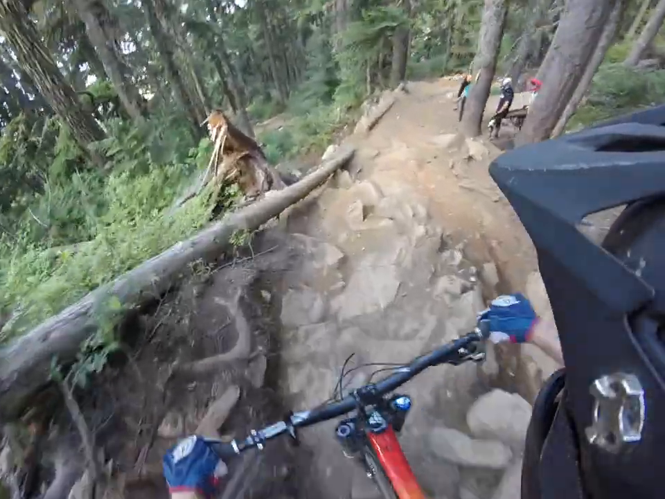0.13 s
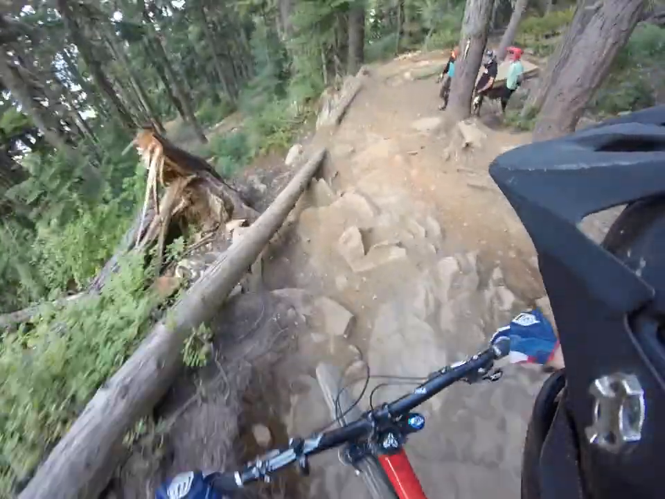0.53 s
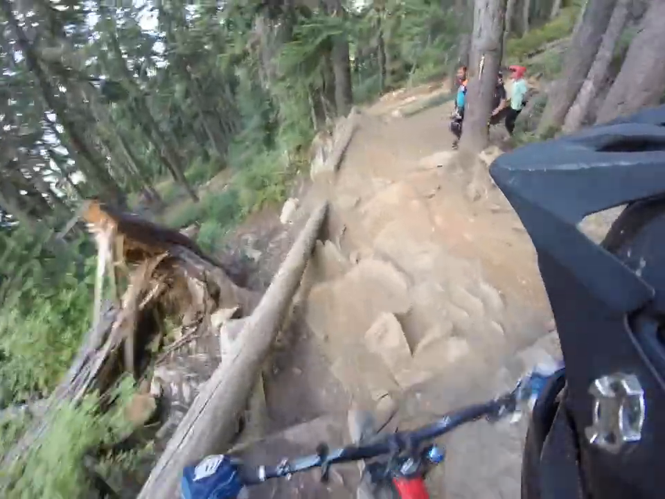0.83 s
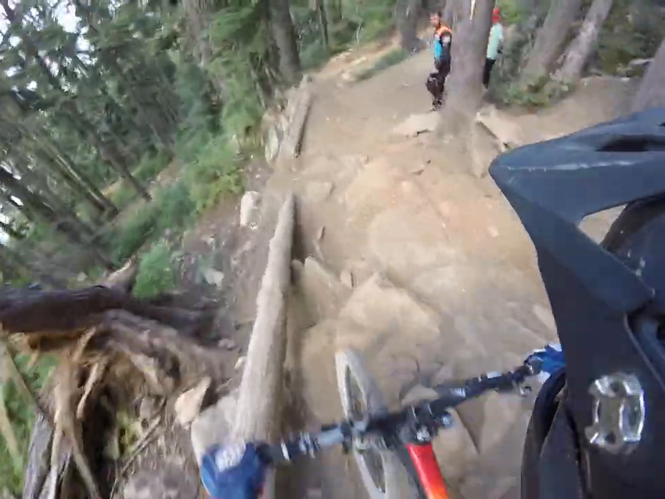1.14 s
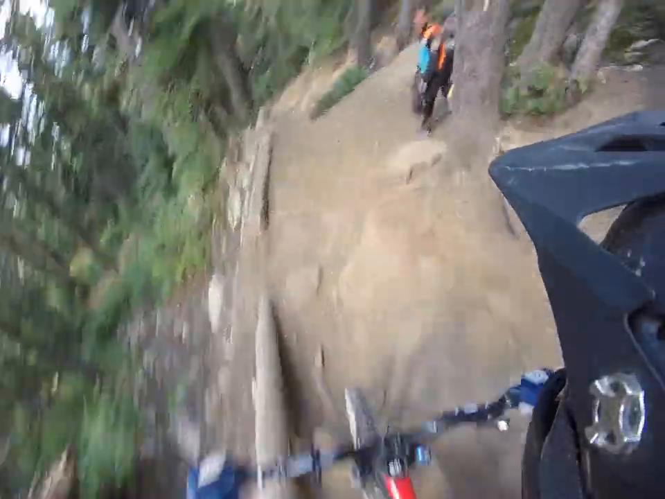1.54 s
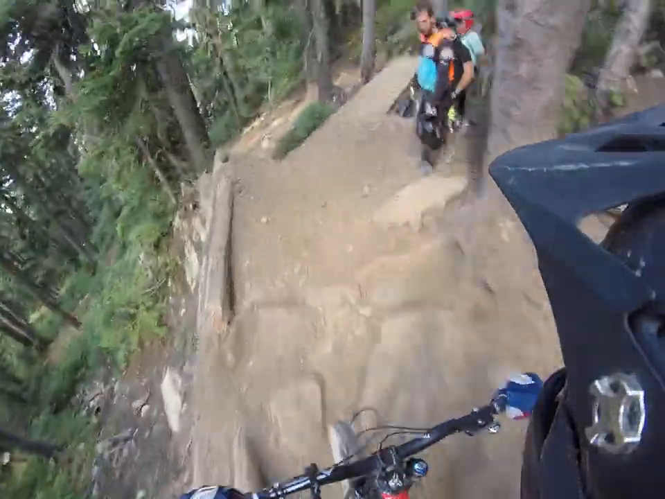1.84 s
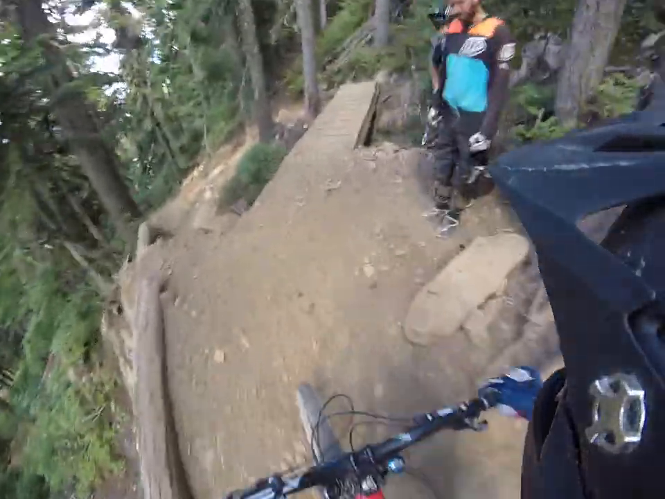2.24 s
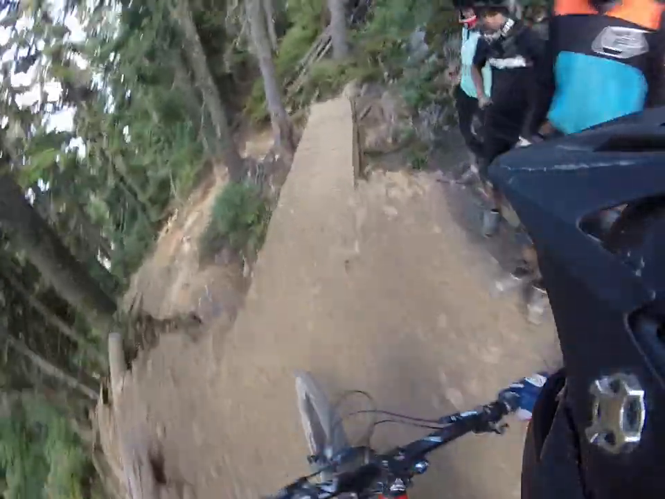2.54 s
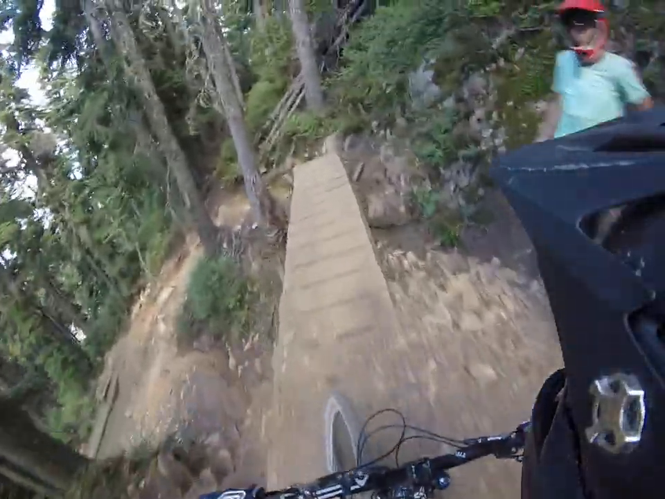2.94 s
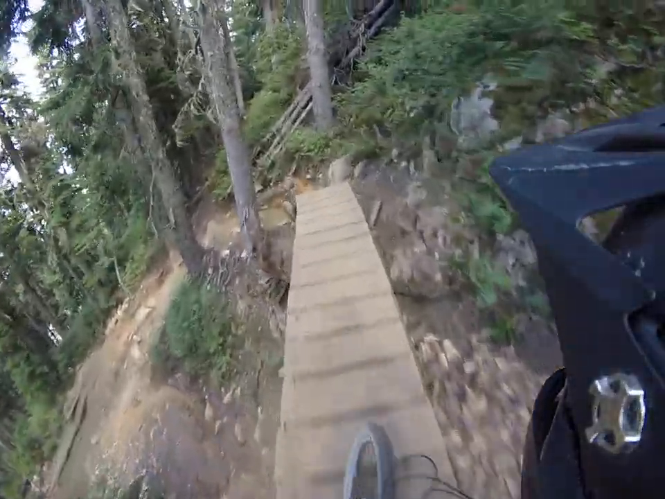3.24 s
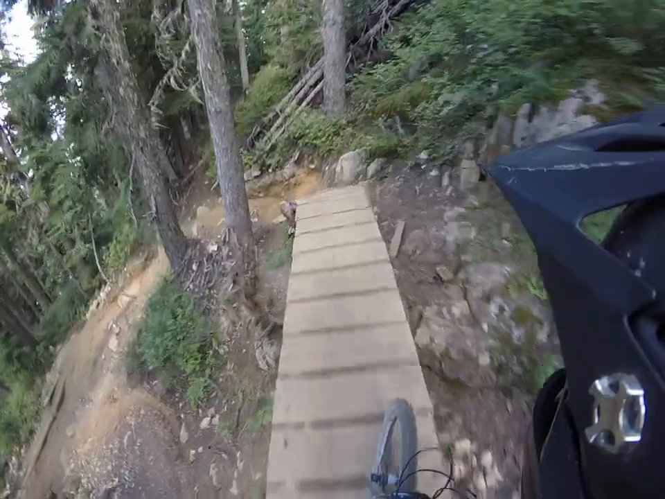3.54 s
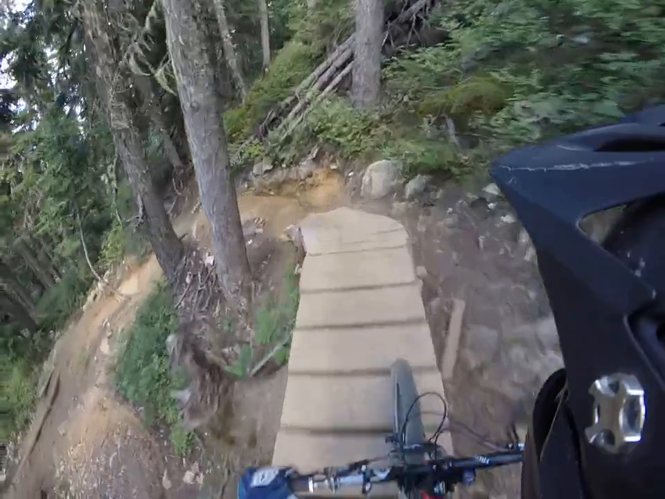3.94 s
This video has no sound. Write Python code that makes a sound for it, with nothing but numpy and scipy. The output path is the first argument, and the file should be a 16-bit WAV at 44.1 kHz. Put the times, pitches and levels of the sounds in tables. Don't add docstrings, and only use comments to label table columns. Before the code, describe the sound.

Close helmet-camera sound inside a closed housing: a mountain bike bumps over rocks outdoors. Chain slaps, cable ticks, spoke pings and dull tyre knocks come in irregular bursts, densest around two seconds, then thin out on smoother ground. Low wind gusts boom beneath, and faint brake squeaks sit extremely high. Trees add only short, faint echoes.

```python
import sys
import numpy as np
from scipy import signal
from scipy.fft import rfft, irfft, next_fast_len
from scipy.io import wavfile
from scipy.ndimage import uniform_filter1d, map_coordinates

SR = 44100
rng = np.random.default_rng(int(sys.argv[2]) if len(sys.argv) > 2 else 0)


def ratio_of_db(decibels):
    return 10 ** (np.asarray(decibels, float) / 20)


def store_wav(level_fs):
    pcm = np.round(np.clip(np.atleast_2d(level_fs), -1, 1) * 32767)
    wavfile.write(sys.argv[1], SR, pcm.T.astype(np.int16))


N = 180898

# (frequency [Hz], width [Hz], level [dB])
HOUSING = [(1590, 164, -2.5), (2367, 220, 7.5), (3205, 158, 6), (4106, 450, 5), (4803, 220, 4),
           (5486, 256, 7), (6850, 556, 5.5), (8140, 780, 2)]

# (time [s], peak level [dB], pitch [Hz], t60 [s])
TICKS = [(0.5317, -38.5, 2400, 0.021), (0.71, -41, 1218, 0.094), (0.7442, -32.5, 1210, 0.056),
         (0.827, -40, 1220, 0.037), (0.8568, -37, 1536, 0.056), (1.1987, -64, 1190, 0.023),
         (1.2315, -36.5, 1155, 0.034), (1.271, -44, 2150, 0.026), (1.454, -52, 1210, 0.058),
         (1.6, -39, 2050, 0.031), (1.815, -32, 3060, 0.023), (1.88, -39, 1630, 0.031),
         (2.072, -33.5, 2350, 0.041), (2.113, -30.5, 1604, 0.057), (2.139, -32.5, 2350, 0.049),
         (2.2075, -31.5, 2370, 0.0091), (2.2176, -32, 2930, 0.023), (2.2404, -34, 2570, 0.027),
         (2.4025, -43, 1300, 0.027), (2.441, -44, 1360, 0.024), (2.4989, -35.5, 2160, 0.023),
         (2.538, -37, 2540, 0.026), (2.55, -36.5, 2220, 0.033), (3.0834, -38, 2570, 0.053),
         (3.1494, -42.5, 2110, 0.068), (3.229, -46, 1300, 0.014), (3.2446, -32.5, 2280, 0.017),
         (3.2702, -35, 1930, 0.011), (3.391, -47, 2200, 0.02), (3.7013, -45.5, 2330, 0.019)]
# (time [s], peak level [dB], pitch [Hz], t60 [s])
SLAPS = [(.0504, -16.5, 2454, 0.022), (0.237, -25, 1590, 0.053), (.502, -32, 2340, 0.06),
         (.6848, -27, 2450, 0.04), (.7241, -27, 2140, 0.015), (1.1108, -26.5, 2410, 0.052),
         (1.124, -38, 2410, 0.037), (1.1794, -34, 2274, 0.071), (1.4814, -25, 2474, 0.041),
         (1.4994, -30, 2120, 0.026), (1.6874, -41, 2160, 0.011), (1.7579, -20.5, 2496, 0.035),
         (2.091, -24, 2340, 0.018), (2.189, -33, 1590, 0.023), (2.3244, -18.5, 3170, 0.015),
         (2.3494, -31, 2150, 0.041), (2.36, -32, 2430, 0.022), (2.5237, -33, 2360, 0.015),
         (2.645, -23, 2533, 0.026), (2.6537, -20.5, 2380, 0.013), (3.0551, -31, 2387, 0.029),
         (3.2548, -19.5, 2480, 0.022), (3.9362, -31.5, 2560, 0.042)]
# (time [s], peak level [dB], pitch [Hz], t60 [s])
CLACKS = [(.0005, -31.5, 1800, 0.032), (0.024, -41, 1875, 0.094), (1.351, -39, 1790, 0.026),
          (1.556, -22, 2030, 0.023), (1.581, -26, 1490, 0.025), (1.6107, -29, 2100, 0.017),
          (1.6403, -16.5, 2430, 0.0094), (1.9643, -22.5, 1450, 0.017), (2.126, -28, 2310, 0.038),
          (2.083, -32, 2320, 0.049), (2.159, -27, 2360, 0.023), (1.224, -36.5, 2440, 0.02),
          (1.623, -36.5, 1300, 0.07)]
# (time [s], peak level [dB], pitch [Hz], t60 [s])
THUMPS = [(0.176, -42, 2440, 0.016), (.3386, -42.5, 1433, 0.18), (.4606, -37.5, 2250, 0.05),
          (.4785, -34, 770, 0.074), (.479, -36, 1770, 0.019), (.5745, -30, 1935, .025),
          (.695, -43, 1760, .025), (1.104, -36, 980, 0.037), (1.155, -47, 896, 0.037),
          (1.317, -30, 1000, 0.027), (1.333, -34.5, 934, 0.032), (2.094, -28, 1560, 0.022),
          (2.058, -39, 1020, .03), (2.358, -36, 1770, 0.027), (0.563, -29, 2260, 0.03),
          (0.5745, -39.5, 940, 0.013), (0.667, -33, 1570, 0.023), (.69, -33, 770, 0.031),
          (.9028, -31.5, 2170, 0.026), (1.0769, -43, 2420, 0.069), (1.1545, -28, 2166, 0.059),
          (1.307, -31.5, 1815, 0.062), (1.33, -29.5, 1910, 0.033), (1.3705, -31, 1910, 0.013),
          (1.7954, -34, 1306, 0.02), (1.936, -34, 1770, 0.024), (2.4608, -47, 2210, 0.036),
          (2.622, -37, 2520, 0.066), (2.7334, -40, 2230, 0.029), (2.759, -36.5, 2260, 0.061),
          (3.33, -40.5, 2270, 0.039), (3.525, -41.5, 1530, 0.094), (3.889, -44.5, 1770, 0.024),
          (3.556, -31.5, 1830, 0.016), (.206, -44, 2170, .04), (.77, -43, 1490, 0.026),
          (.94, -44, 2210, 0.031), (1.409, -50, 2000, 0.024), (1.715, -40, 2060, 0.045),
          (2.346, -39, 1120, 0.039), (2.45, -41, 2480, 0.03), (2.487, -39.5, 790, 0.028),
          (2.953, -40.5, 1600, 0.019),
          (.4792, -31, 1500, .02), (.5745, -28, 930, .022), (.691, -32, 1900, .025),
            (2.3255, -22, 2480, .025), (2.334, -31, 2000, .04)]
# (time [s], peak level [dB], pitch [Hz], t60 [s])
SCUFFS = [(0.2894, -39.5, 1410, 0.028), (0.676, -40, 2300, 0.021), (0.99, -37, 2480, 0.017),
          (1.0622, -42, 2460, 0.029), (1.527, -43, 1280, 0.027), (1.659, -35, 2300, 0.034),
          (1.837, -33.5, 1590, 0.029), (1.864, -43, 1310, 0.056), (2.027, -29.5, 2230, 0.014),
          (2.035, -38, 2340, 0.093), (2.1687, -30, 2220, 0.044), (2.2667, -39.5, 2400, 0.023),
          (2.307, -40.5, 1780, 0.026), (2.605, -40.5, 1220, 0.05), (2.689, -43, 1300, 0.065),
          (2.84, -44.5, 2500, 0.058), (2.9295, -42, 2990, 0.024), (3.018, -49, 1996, 0.12),
          (3.46, -46, 1640, 0.048), (3.507, -49.5, 1220, 0.1), (3.787, -38.5, 2220, 0.021)]
# (time [s], peak level [dB], pitch [Hz], t60 [s])
PINGS = [(0.0369, -30, 4670, 0.044), (0.0758, -35, 4620, 0.032), (0.1136, -39.5, 5620, 0.045),
         (0.177, -37, 6460, 0.03), (0.2481, -30.5, 4660, 0.024), (0.3682, -37.5, 5600, 0.035),
         (0.4499, -42, 6690, 0.044), (0.476, -44, 5430, 0.022), (0.5544, -43, 5240, 0.025),
         (0.6784, -39, 5250, 0.022), (0.7734, -42, 5580, 0.029), (0.8644, -41, 6300, 0.017),
         (0.89, -40, 5050, 0.044), (0.9094, -48, 5500, 0.035), (0.967, -37, 5570, 0.035),
         (1.0056, -35.5, 5440, 0.035), (1.056, -43, 6490, 0.032), (1.0784, -34.5, 5420, 0.027),
         (1.0905, -44, 4450, 0.018), (1.1274, -53, 4830, 0.022), (1.1644, -45, 4810, 0.05),
         (1.173, -33, 5720, 0.037), (1.1894, -52, 5540, 0.027), (1.214, -37, 4620, 0.023),
         (1.2485, -54, 4500, 0.035), (1.3643, -44.5, 4690, 0.045), (1.4075, -47, 4590, 0.035),
         (1.5675, -37.5, 4800, 0.017), (1.6856, -40, 4760, 0.035), (1.7095, -43, 5800, 0.024),
         (1.7443, -48, 6660, 0.03), (1.7953, -41, 4620, 0.042), (1.842, -36, 5580, 0.038),
         (1.8624, -45, 5900, 0.029), (1.8731, -41, 4730, 0.044), (1.899, -40, 5500, 0.024),
         (2.01, -42, 4840, 0.049), (2.027, -43, 5700, 0.042), (2.191, -34, 5530, .02),
         (2.3414, -37, 6460, 0.027), (2.3814, -44, 5050, 0.031), (2.459, -41, 4380, 0.032),
         (2.489, -42, 4630, 0.027), (2.7784, -43.5, 5820, 0.031), (3.017, -42, 5180, 0.035),
         (3.119, -42, 6750, 0.032), (3.5233, -46, 5510, 0.035)]
# (time [s], peak level [dB])
SPARKS = [(0.0503, -55), (0.2458, -61), (0.5033, -53), (0.7487, -53), (0.8629, -44), (1.1139, -46),
          (1.2356, -62), (1.6392, -60), (1.7599, -56), (1.8437, -57), (1.8786, -50), (1.9654, -51),
          (2.0348, -53), (2.0717, -54), (2.096, -38), (2.1428, -33), (2.2179, -58), (2.3241, -45),
          (2.5521, -58), (2.6449, -63), (3.245, -39), (3.2554, -55), (3.271, -46), (3.7878, -60)]
# (dull [dB], middle [dB], bright [dB], top [dB], own note [dB])
CONTACT_MIX = [
    (-42, -1.5, -4, -29, -15.5),
    (-30, -7, -16.5, -36, -15),
    (-18.5, -7.5, -22, -45, -10),
    (-13, -10, -33, -50, -9.5),
    (-18, -4.5, -9.5, -35, -13.5),
    (-22, -6.5, -13, -34, -9),
    (-60, -25, -12, 16, -29),
]
RISES = [.05, .04, .035, .03, .03]

# (time [s], level [dB])
SPEED = [(0, 5), (.45, -5.5), (.7, 4.5), (1.2, 0.5), (1.55, -0.5), (2, -5), (2.55, -2.5), (3.2, -8.5),
         (3.6, -11), (4.1, -6.5)]
# (time [s], rattle level [dB], half width [s], crunch over rattle [dB])
SHAKES = [(.07, -59, 0.08, -21), (.48, -58, 0.061, -15), (0.979, -60, 0.41, -21), (1.72, -59.5, 0.039, -9),
          (1.871, -57.5, 0.096, 3.5), (2.0, -54.5, 0.058, -8), (2.13, -50, 0.067, -2),
          (2.33, -51, 0.055, -34), (2.52, -55, 0.028, -3)]

# (time [s], peak level [dB], pitch [Hz], t60 [s])
SQUEAKS = [(0.0483, -61, 13200, 0.2), (0.2988, -56.5, 12950, 0.35), (0.377, -57.5, 13300, 0.23),
           (0.437, -54.5, 13040, 0.18), (0.5242, -62, 13200, 0.2), (0.5786, -64, 13100, 0.18),
           (1.57, -74, 13100, 0.4), (1.6965, -64, 13000, 0.29), (1.758, -57.5, 13000, 0.55),
           (1.8357, -62, 12950, 0.22), (1.912, -64, 12900, 0.25), (2.135, -65, 12950, 0.3),
           (2.252, -58, 13000, 0.38), (2.3216, -58, 12600, 0.22), (2.397, -55, 12960, 0.2),
           (2.4643, -64, 12700, 0.28), (2.765, -54.5, 12950, 0.45), (2.862, -43.5, 12870, 0.15),
           (3.095, -70, 12750, 0.27), (3.172, -46, 13140, 0.17), (3.5554, -54, 12600, 0.32),
           (3.79, -48, 12870, 0.24), (3.925, -62, 12500, 0.14), (4.079, -53, 12600, 0.14)]
# (time [s], peak level [dB], pitch [Hz], t60 [s])
THIN_SQUEAKS = [(1.008, -54, 14900, 0.088), (1.316, -49, 14950, 0.077)]

# (time [s], boom level [dB], half width [s], flutter over boom [dB], ring [Hz])
GUSTS = [(.036, -32.5, 0.059, -15.5, 35.7), (0.088, -33, 0.02, -23, 35.6),
         (0.153, -17.5, 0.01, -15.5, 34.7), (0.237, -27.5, 0.042, -16, 36), (.292, -9.5, 0.0096, -16.5, 38),
         (0.337, -14.5, 0.0066, -24, 29), (0.408, -29, 0.066, -27, 38), (0.505, -19, 0.0074, -23, 35.6),
         (0.565, -22.5, 0.017, -37, 39), (0.61, -18.5, 0.034, -31, 41.4), (0.718, -21, 0.023, -26, 38),
         (0.753, -14.5, 0.032, -16.5, 46.8), (0.814, -6.5, 0.033, -25, 47), (.887, -21, 0.019, -16, 38.3),
         (0.966, -17.5, 0.05, -21, 39.2), (1.069, -27, 0.12, -24, 33.4), (1.15, -22, 0.039, -27, 45.4),
         (1.222, -9, 0.056, -25.5, 45.6), (1.308, -20.5, 0.031, -23.5, 41.2),
         (1.419, -23, 0.053, -22.5, 40.6), (1.548, -19.5, 0.026, -23, 36),
         (1.644, -24.5, 0.022, -12.5, 39.4), (1.699, -25, 0.056, -14.5, 47.5),
         (1.796, -20, 0.018, -18, 28.6), (1.862, -13, 0.033, -25, 43.4), (1.911, -14, 0.03, -43, 44),
         (1.944, -19, 0.011, -16, 30), (1.988, -11, 0.0277, -22.5, 44.4), (2.04, -24.5, 0.052, -16, 47),
         (2.112, -17, 0.028, -24.5, 30), (2.174, -14, 0.022, -29, 44.7), (2.208, -18, 0.017, -13.5, 46.5),
         (2.265, -19, 0.03, -18, 34.2), (2.431, -29, 0.095, -22, 42), (2.591, -24.5, 0.043, -19, 40.8),
         (2.731, -28.5, 0.074, -22, 39.3), (3.128, -32, 0.051, -31, 38.4), (3.467, -33, 0.028, -13, 40),
         (3.6, -38.5, 0.07, -23, 41.8), (3.761, -38.5, 0.088, -33, 44.4)]
# (frequency [Hz], level [dB per Hz])
BOOM = [(6, -21), (14, -7.5), (25, -2.5), (34, -11), (46, -4.5), (56, -8.5), (62, -26), (70, -120)]
# (frequency [Hz], level [dB])
FLUTTER = [(62, -120), (70, 8), (95, -0.5), (118, 0.5), (128, 1), (140, -120)]
# (frequency [Hz], level [dB])
THUD = [(125, -120), (140, 2), (200, -1), (300, -9.5), (450, -120)]
# (frequency [Hz], level [dB])
RUSH = [(200, -120), (290, -10), (945, -17.5), (1400, -20.5), (2290, -25), (2790, -24), (5550, -29.5),
        (7000, -33.5), (12500, -41.5), (13500, -39), (15400, -56.5)]
# (time [s], peak level [dB], half width [s])
HUMS = [(.04, -80, 0.026), (.39, -41.5, 0.016), (.56, -45.5, 0.021), (.97, -46, 0.081), (1.36, -58, 0.026),
        (1.941, -51, 0.029), (2.23, -45.5, 0.044), (2.37, -49.5, 0.027), (2.8, -48.5, 0.063),
        (3.16, -55, 0.028), (3.33, -52, 0.058), (3.9, -54, 0.019), (4.06, -54, 0.018)]
# (time [s], peak level [dB], half width [s])
CASING = [(.265, -57, 0.017), (.51, -61, 0.015), (.79, -58.5, 0.022), (.9, -63, 0.017), (1.88, -57, 0.0117),
          (1.955, -61, 0.024), (2.19, -61, .015)]

CRUNCH_DB, RATTLE_DB = -61.5, -62
CALM_BOOM_DB, CALM_FLUTTER_DB = -42, -57.5
CALM_THUD_DB, CALM_RUSH_DB = -62, -64.5
THUD_FOLLOWS, RUSH_FOLLOWS = 0.35, 0.16
FLUTTER_LEAD_S = 0.016
MOUNT_DB, RAGGED_DB = -0.5, -14
HUM_HZ, CASING_HZ = 116.5, 402.8
LEAD_IN_S, LEAD_IN_DB = 0.0025, -15.5
LUMPY_DB = 1.2
SPARK_HZ, SPARK_T60_S = 7000, 0.018
TOP_HZ = 15600


def unit(x):
    return x / np.sqrt(np.mean(x ** 2) + 1e-20)


def along(points, hz):
    f, v = np.transpose(points)
    return np.interp(np.log(hz + 1), np.log(f + 1), v)


def curves(rows):
    s, *cols = np.transpose(rows)
    return [ratio_of_db(np.interp(np.arange(N) / SR, s, c)) for c in cols]


def swells(times, dbs, widths):
    t = np.arange(0, N + 64, 64) / SR
    power = ratio_of_db(2 * dbs) @ np.exp(-((t - times[:, None]) / widths[:, None]) ** 2)
    return np.sqrt(np.interp(np.arange(N) / SR, t, power))


def wobble(rate):
    knots = rng.standard_normal(int(N * rate / SR) + 4)
    return map_coordinates(knots, [np.arange(N) * rate / SR])


def filtered(x, response):
    m = next_fast_len(N + SR // 2)
    return irfft(rfft(x, m) * response(np.fft.rfftfreq(m, 1 / SR)), m)[..., :N]


def coloured(spectrum):
    return unit(filtered(rng.standard_normal(N), lambda hz: ratio_of_db(along(spectrum, hz))))


def steadied(x, size):
    envelope = np.abs(signal.hilbert(x, next_fast_len(N))[:N])
    return unit(x / (uniform_filter1d(envelope, size=size) + .2) ** .85)


def band(f, low_hz, high_hz):
    return (1j * f / (low_hz + 1j * f) * high_hz / (high_hz + 1j * f)) ** 2


def housing(f, broad_db):
    response = ratio_of_db(broad_db)
    for k, (centre, width, db) in enumerate(HOUSING):
        mode = 1j * f * width / (centre * centre - f * f + 1j * f * width)
        response = response + (-1) ** k * ratio_of_db(db) * mode
    return response


def contact_colours(f):
    shell = housing(f, broad_db=-12.0)
    dull = 4 * band(f, low_hz=658, high_hz=1300) ** 2
    middle = 3 * shell * band(f, low_hz=1300, high_hz=3870) ** 2
    bright = 3 * shell * band(f, low_hz=4430, high_hz=8080) ** 2
    top = band(f, low_hz=8500, high_hz=10200) / (1 + (f / 13800) ** 8)
    own_note = 0.6 * band(f, low_hz=504, high_hz=6750)
    return np.array([dull, middle, bright, top, own_note])


def knocks():
    early = SR // 50
    t = np.arange(SR // 8) / SR - early / SR
    lead_in = ratio_of_db(LEAD_IN_DB) * np.exp(t / LEAD_IN_S) * (t < 0)
    t = np.maximum(t, 0)
    parts = np.zeros((5, N + len(t)))
    lasting = np.array([[1.6], [1.05], [.9], [.6], [1.3]])
    sparks = [(s, db, SPARK_HZ, SPARK_T60_S) for s, db in SPARKS]
    kinds = [TICKS, SLAPS, CLACKS, THUMPS, SCUFFS, PINGS, sparks]
    trim_db = np.array([8.0, 0, 8.5, -4, 0])
    for rows, mix_db in zip(kinds, CONTACT_MIX):
        gains = ratio_of_db(np.array(mix_db) + trim_db)[:, None]
        for s, db, hz, t60 in rows:
            t60 = np.clip(t60, .008, .15)
            rise = 1 - np.exp(-(t / (np.c_[RISES] * t60)) ** 2)
            fade = ratio_of_db(db - 60 * t / (lasting * t60)) * rise
            lead_in_end = lead_in.max() * np.exp(-t / (0.013 * t60)) * (t > 0)
            fade += ratio_of_db(db) * (lead_in + lead_in_end)
            fade[-1] *= np.sin(2 * np.pi * hz * t)
            parts[:, round(s * SR):][:, :len(t)] += gains * fade
    drive = rng.standard_normal((5, N))
    for k, (low, high) in enumerate([(400, 2400), (900, 8000), (2800, 16000)]):
        hiss = filtered(drive[k], lambda f: (f > low) & (f < high))
        drive[k] = hiss.std() * steadied(hiss, size=110)
    slow = uniform_filter1d(uniform_filter1d(drive[-1], size=25), size=25)
    drive[-1] = 1.46 + unit(slow)
    parts = parts[:, early:N + early] * ratio_of_db(LUMPY_DB * wobble(260)) * drive
    return filtered(parts, contact_colours).sum(axis=0)


def grit(rate, spread_db, life_s, biggest):
    strength = np.minimum(rng.exponential(size=N), biggest)
    sizes = (rng.random(N) < rate / SR) * ratio_of_db(spread_db * strength)
    fade = np.exp(-np.arange(1500) / SR / life_s)
    return unit(signal.fftconvolve(sizes, fade)[:N] * rng.standard_normal(N))


def tyres():
    speed, = curves(SPEED)
    s, db, width, crunch_db = np.transpose(SHAKES)
    crunch = np.hypot(ratio_of_db(CRUNCH_DB) * speed, swells(s, db + crunch_db, width))
    rattle = np.hypot(ratio_of_db(RATTLE_DB) * speed, swells(s, db, width))

    def crunch_colour(f):
        return housing(f, broad_db=-5.0) * band(f, low_hz=980, high_hz=3620) / (1 + (f / 2750) ** 10)

    def rattle_colour(f):
        return housing(f, broad_db=-23.0) * band(f, low_hz=2820, high_hz=8300)

    low = filtered(grit(600, spread_db=17.5, life_s=0.0077, biggest=1.46), crunch_colour)
    high = filtered(grit(500, spread_db=30.0, life_s=0.0019, biggest=0.76), rattle_colour)
    return ratio_of_db(1.0) * crunch * unit(low) + ratio_of_db(-10.0) * rattle * unit(high)


def brake():
    out, t = np.zeros(N + SR), np.arange(SR // 4) / SR
    for s, db, hz, t60 in SQUEAKS + THIN_SQUEAKS:
        dip = 190 * np.exp(-t / .007)
        creep = 240 * (1 - np.exp(-(t / .08) ** 2))
        pitch = hz - 60 + dip + creep
        fray = signal.fftconvolve(rng.standard_normal((2, len(t))), np.hanning(260)[None], "same")
        fray = (fray[0] + 1j * fray[1]) / fray.std()
        clean = np.exp(-(t / .024) ** 2)
        note = (clean + (.45 - 0.15 * clean) * fray) * np.exp(2j * np.pi * np.cumsum(pitch) / SR)
        fade = ratio_of_db(db + 3.5 - 60 * t / t60) * (1 - np.exp(-(t / 0.0058) ** 2))
        out[round(s * SR):][:len(t)] += fade * note.real
    return out[:N]


def wavering_tone(rows, hz, drift_hz, rate):
    phase = 2 * np.pi * np.cumsum(hz + drift_hz * wobble(rate)) / SR
    return swells(*np.transpose(rows)) * np.sin(phase)


def wind():
    s, db, width, flutter_db, ring_hz = np.transpose(GUSTS)
    ragged = np.hypot(ratio_of_db(CALM_BOOM_DB), swells(s, db + RAGGED_DB, 1.3 * width))
    boom = ragged * steadied(coloured(BOOM), size=600)
    for at, peak_db, half, hz in zip(s, db, width, ring_hz):
        near = slice(max(round((at - .2) * SR), 0), round((at + .2) * SR))
        late = np.arange(N)[near] / SR - at
        bell = np.exp(-(late / (0.95 * half)) ** 2)
        boom[near] += ratio_of_db(peak_db + MOUNT_DB) * bell * np.sin(2 * np.pi * hz * late)
    boom = filtered(boom, lambda hz: 1 / (1 + (hz / 61) ** 24))
    lift_db = db + flutter_db - CALM_FLUTTER_DB - 4.0
    lift = np.hypot(1, swells(s - FLUTTER_LEAD_S, lift_db, 0.5 * width))
    flutter = ratio_of_db(CALM_FLUTTER_DB) * lift * steadied(coloured(FLUTTER), size=900)
    thud = ratio_of_db(CALM_THUD_DB) * lift ** THUD_FOLLOWS * steadied(coloured(THUD), size=900)
    strap = wavering_tone(HUMS, HUM_HZ, drift_hz=3, rate=9.4)
    casing = wavering_tone(CASING, CASING_HZ, drift_hz=8, rate=30)
    rush = ratio_of_db(CALM_RUSH_DB) * lift ** RUSH_FOLLOWS * ratio_of_db(4.0 + 0.66 * wobble(3.52)) * coloured(RUSH)
    return boom + flutter + thud + strap + casing + rush


def trees(x, gap_s, t60):
    t = np.arange(SR // 2) / SR
    tail = rng.standard_normal(len(t)) * ratio_of_db(-60 * t / t60) * (t > gap_s)
    return signal.fftconvolve(x, tail / np.linalg.norm(tail))[:N]


def scene():
    clatter = knocks()
    echoes = ratio_of_db(-11.0) * trees(clatter, gap_s=0.0089, t60=0.077)
    return (clatter + tyres() + brake() + wind() + echoes)[None]


def thinned_treble(x, size=10):
    hz, _, z = signal.stft(x, SR, nperseg=2048)
    rows = np.arange(len(hz)) // size
    power = np.add.reduceat(np.abs(z[0]) ** 2, np.arange(0, len(hz), size))
    level = 10 * np.log10(power + 1e-20)[rows]
    squeak = level[(hz > 12200) & (hz < 14000)].max(axis=0)
    below = level[(hz > 11000) & (hz < 12000)].mean(axis=0)
    band_chance = 4 * rng.standard_normal((rows[-1] + 1, z.shape[-1]))[rows]
    moment_chance = 11 * uniform_filter1d(rng.standard_normal(z.shape[-1]), size=3)
    chance = 2 + band_chance + moment_chance
    need = np.maximum(below - 10 + 12 * (hz[:, None] > 15100) + chance, squeak - 23)
    dropped = (hz[:, None] > 12900) & (level < need)
    return signal.istft(z * np.where(dropped, ratio_of_db(-26), 1), SR, nperseg=2048)[1][:, :N]


def band_limit(x):
    return signal.sosfilt(signal.butter(12, 15600, fs=SR, output="sos"), x)


def record(dry):
    mix = thinned_treble(filtered(dry, lambda hz: hz < TOP_HZ))
    return band_limit(mix)


dry = scene()
out = record(dry)
store_wav(out)
```